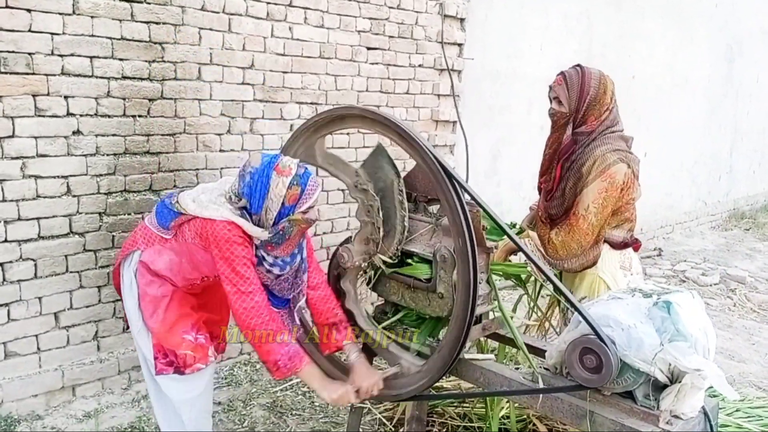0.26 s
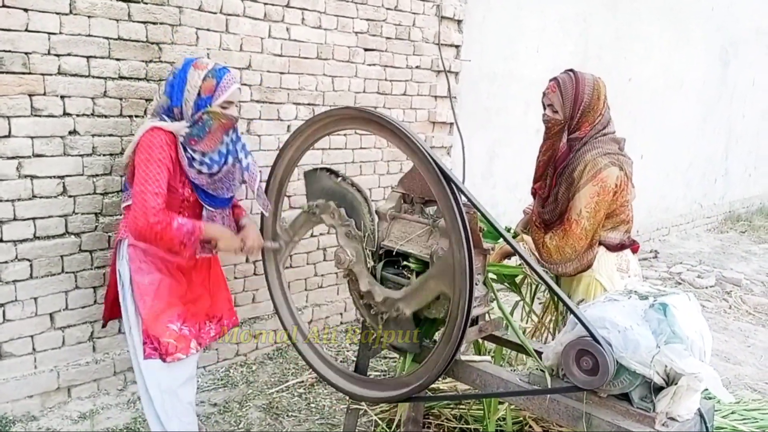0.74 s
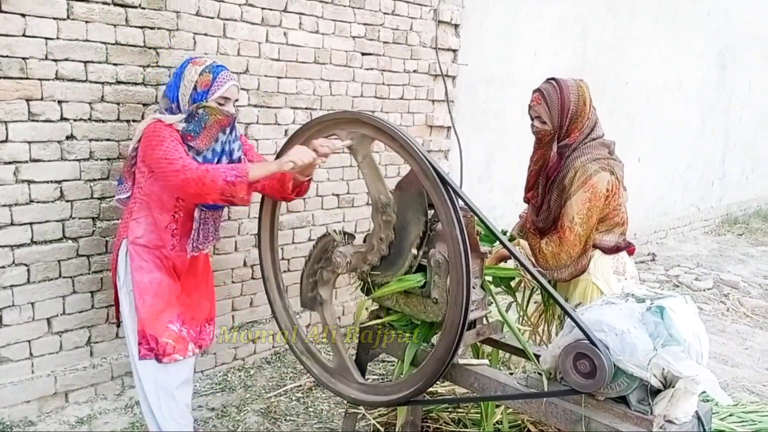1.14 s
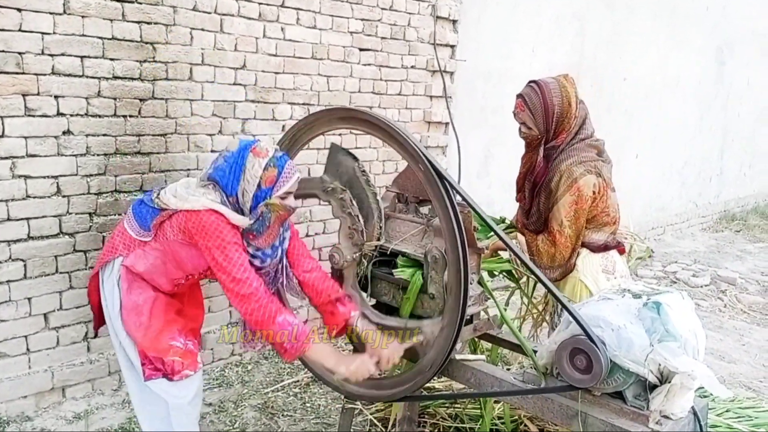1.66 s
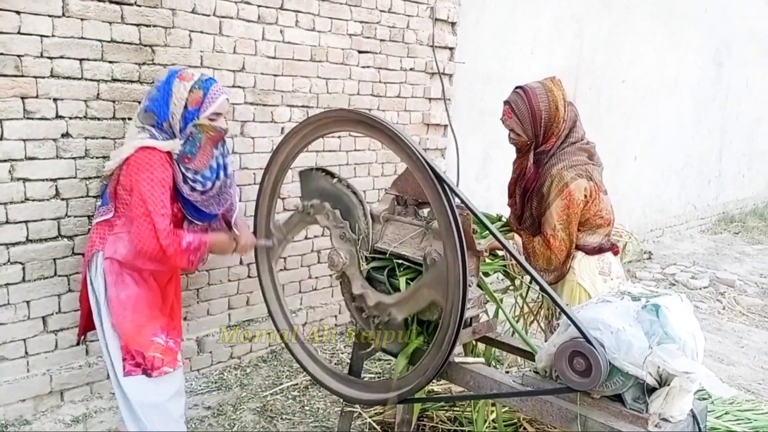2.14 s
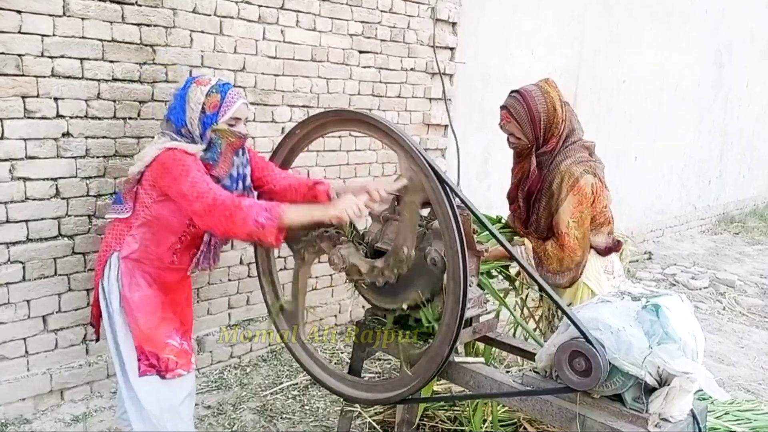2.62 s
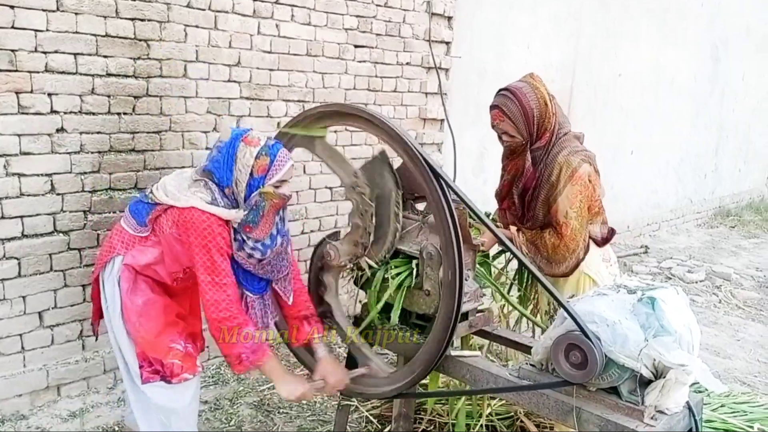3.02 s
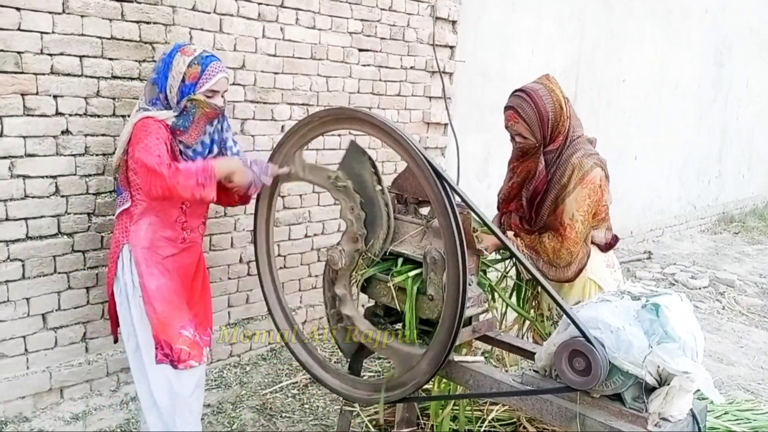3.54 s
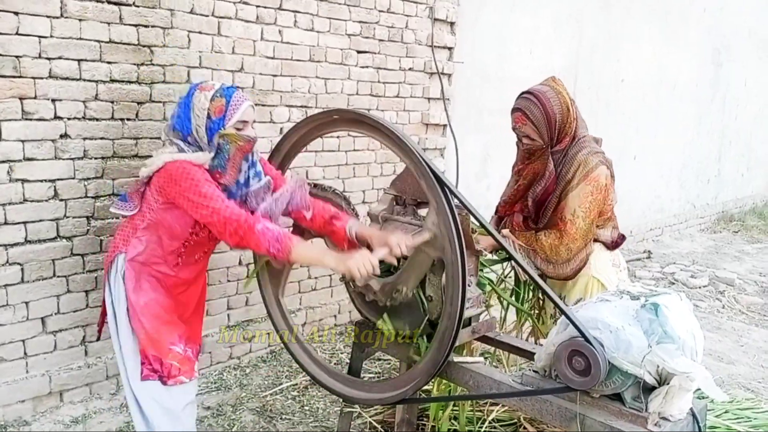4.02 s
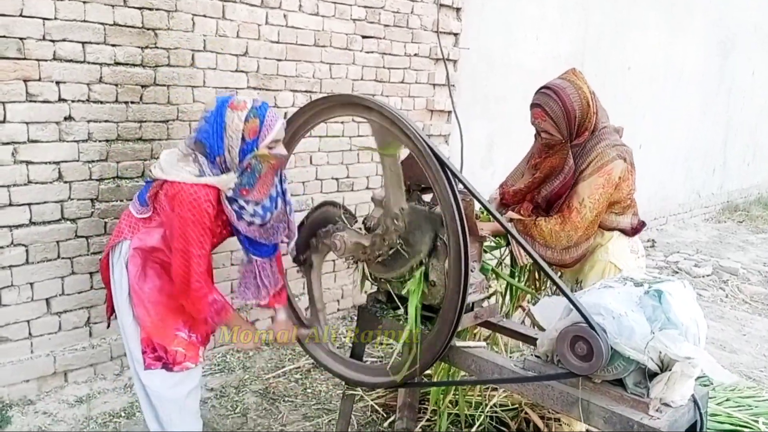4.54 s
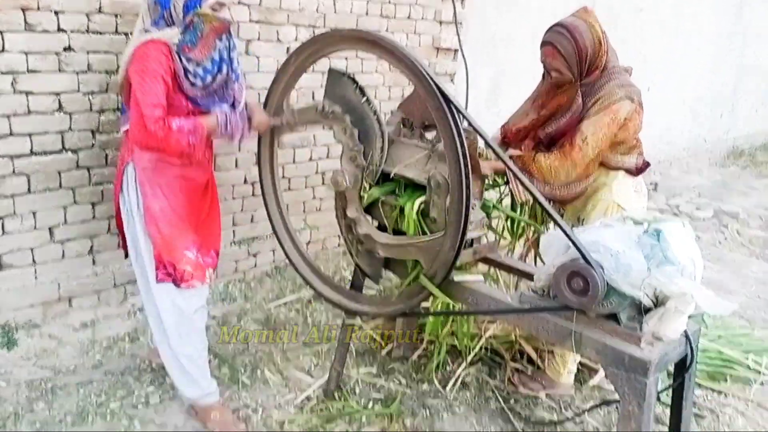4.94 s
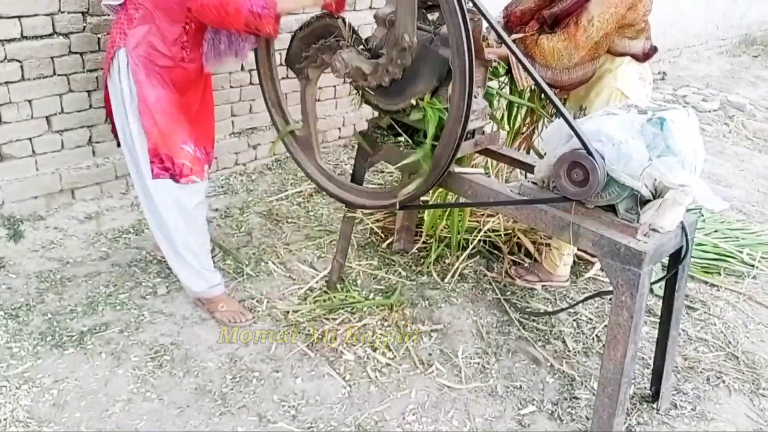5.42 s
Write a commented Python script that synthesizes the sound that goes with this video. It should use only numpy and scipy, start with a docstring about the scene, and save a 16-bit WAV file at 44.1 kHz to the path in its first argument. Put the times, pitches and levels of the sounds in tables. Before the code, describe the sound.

Outdoors, regular metallic clacks and crisp shearing crunches of fresh fodder repeat, with rustling stalks and hoarse squeaks over faint hiss.

```python
"""A yard before a brick wall, outdoors: a hand-turned chaff cutter works while light wind bumps the microphone.
Each blade knocks against the mouth plate, a rattling contact that rings the modes of the cast iron.
It then shears through green stalks: random snaps and rubbing noise swell to a crunch and shake the iron.
Gears tick and loose stalks rustle between strokes; near the start something squeaks, a rough gliding tone.
Streaky hiss and the wheel's narrow whirr lie underneath; the wall answers the knocks and squeaks."""
import sys
import numpy as np
from scipy import signal
from scipy.fft import rfft, irfft, next_fast_len
from scipy.io import wavfile
from scipy.ndimage import uniform_filter1d, map_coordinates

SR = 44100
rng = np.random.default_rng(int(sys.argv[2]) if len(sys.argv) > 2 else 0)


def to_wav(s):
    """Save 16-bit WAV."""
    ch = np.atleast_2d(s).T  # columns
    pcm = np.round(np.clip(ch, -1, 1) * 32767)  # PCM
    wavfile.write(sys.argv[1], SR, pcm.astype(np.int16))


N = 250466

# wind on the microphone, before the low cut: t/s, level/dB
BUFFET = [(0.0, -48), (0.03, -43.5), (0.33, -80.5), (0.5, -74), (0.82, -60), (0.98, -72), (1.23, -71),
          (1.47, -64), (1.66, -68), (2.04, -70), (2.17, -77), (2.4, -76.5), (2.55, -66), (3.35, -57),
          (3.59, -69), (4.73, -63), (5.19, -77.5), (5.68, -81)]
# spectrum of the wind, before the low cut: f/Hz, density/dB per Hz
RUMBLE = [(15, -61), (25, -4), (91, 5.5), (125, -0.5), (199, -7.5), (240, -18), (310, -70), (530, -120)]
# single bumps on the microphone: middle t/s, envelope peak level/dB, f/Hz
BUMPS = [(0.027, -34.5, 111), (0.089, -44, 89), (0.634, -46.5, 102), (0.942, -49.5, 80.5),
         (1.277, -50.5, 75.6), (2.902, -48, 99), (2.949, -36, 110), (3.176, -41, 102), (3.219, -42.5, 110),
         (4.457, -40.5, 106), (4.575, -43.5, 100)]
BUMP_CYCLES = 0.64  # from a bump's middle to 1/e of its envelope
# spectrum of the steady outdoor hiss, before its streaks: f/Hz, density/dB per Hz
YARD = [(120, -49), (200, -18), (875, -26), (994, -6.5), (1190, -91), (1330, 8), (1810, 0.5), (2260, 10.5),
        (4120, -12), (6490, -22), (7240, -52), (7930, -3.5), (9340, -30.5), (14700, -16), (15600, -10.5)]
# mean level of the hiss, before its flutter: t/s, level/dB
YARD_LEVEL = [(0, -61), (.8, -60), (1.7, -61.5), (2.8, -60), (3.6, -62), (4.3, -62.5), (5.1, -61.5),
              (5.68, -65)]
# thin bands in which the turning wheel whirrs: f/Hz, width/Hz, relative level/dB
WHIRR = [(991, 32, -4.5), (1349, 36, -3.5), (2305, 43, -0.5)]
WHIRR_DB = -10.5  # over the hiss, on average

# The strokes, rustles and idle wheel give drive levels, before each layer's own gain.
# strokes of a blade through the stalks: entry t/s, rise/s, entry level/dB, entry crackle over it/dB,
# time on to the thick of the bundle/s, level there/dB, swell/dB per s, release/dB per s,
# then at the thick, over the iron: crackle/dB, spray/dB, stand/dB
STROKES = [(.47, 0.044, -47.5, -2.5, 0.14, -49, 127, 304, 4, -4, -16),
           (1.148, 0.012, -42, -5.5, 0.19, -39.5, 111, 191, -6, -13, -8),
           (1.949, .04, -39, 4, 0.19, -46, 141, 130, 1, -6, -18.5),
           (2.496, 0.015, -38.5, -2, 0.15, -35.5, 140, 169, -7.5, -13, -13),
           (3.10, 0.069, -44, -10, 0.17, -37, 247, 173, -6, -5.5, -23),
           (3.738, 0.0057, -41.5, -10, 0.17, -34.5, 119, 244, -7, -14.5, -17),
           (4.56, 0.0092, -41.5, -1, 0.095, -42.5, 151, 173, -2, -8, -10.5),
           (5.248, 0.0037, -47, -0.5, .22, -33.5, 201, 168, -1.5, -12, -20.5)]
# rows iron, crackle, spray, stand: fade of the entry/dB per s, factor on swell and release
EFFORT_SLOPES = [(59.6, 1.15), (231, 1.14), (298, 0.91), (30, 2.05)]
ENTRY_SPRAY_DB, ENTRY_STAND_DB = -10.5, -32  # over the iron; spray also takes half the entry crackle
# loose stalks shifting in the trough between strokes: middle t/s,
# iron level/dB, crackle level/dB, spray level/dB, stand level/dB, half length/s
RUSTLES = [(0.022, -65, -57, -73, -68, 0.0067), (0.187, -65, -63, -66, -83, 0.047),
           (0.42, -61.5, -64, -64.5, -83, 0.065), (0.653, -69, -56, -66, -82, .03),
           (0.757, -62, -58.5, -76, -79, 0.039), (0.933, -79, -58.5, -61, -81, 0.018),
           (1.09, -58.5, -64.5, -85, -88, 0.036), (1.483, -74, -63, -63, -64.5, 0.07),
           (1.52, -50.5, -59, -64, -70, 0.022), (1.71, -73, -63, -60, -87, 0.027),
           (1.9, -66, -68, -59, -79.5, 0.12), (2.188, -73, -52, -54, -93, 0.092),
           (2.439, -52.5, -54.5, -56, -93, 0.034), (2.776, -64, -58, -61.5, -96, 0.15),
           (3.004, -62, -70, -60.5, -85, 0.22), (3.363, -49.5, -77, -72, -75, 0.03),
           (3.527, -69, -68, -63, -91, 0.11), (3.642, -65, -81, -59.5, -91, 0.027),
           (4.02, -56, -61, -57, -83, 0.022), (4.286, -65.5, -59.5, -63.5, -84, 0.043),
           (4.425, -68, -85, -62.5, -78, 0.052), (4.522, -58.5, -64, -53.5, -90, 0.016),
           (4.743, -51.5, -82, -84, -80, 0.061), (4.851, -57.5, -57.5, -55, -90, 0.03),
           (5.034, -67, -59.5, -61.5, -92, 0.038), (5.394, -66, -51.5, -55, -65, 0.058)]
RUSTLE_EDGE_DB = 5.5  # fall from the middle to the half length
# the turning wheel alone: levels/dB of iron, crackle, spray, stand
IDLE_DB = [-74.5, -109, -67.5, -89.5]
# spectrum of breaking stalks, before its streaks: f/Hz, density/dB per Hz
CRUNCH = [(240, -70), (400, -7.5), (491, -16), (595, -1.5), (798, 7), (918, 5.5), (1200, 13.5),
          (3900, -23.5), (5650, -20), (8500, -31), (11000, -112), (18700, -120)]
# finest fibre noise as the microphone colours it, before its streaks: f/Hz, density/dB per Hz
SPRAY = [(4410, -7), (7500, 5), (8000, -23), (9260, -7.5), (11300, -7.5), (14500, 11.5), (14900, 17.5),
         (15600, -20)]
# free modes of cast wheel, blades and trough: f/Hz, relative level/dB, t60/s
IRON = [(467, -13.5, 0.21), (538.5, -13, 0.3), (632, -2, 0.14), (725.7, -3, 0.11), (808.7, -0.5, 0.088),
        (1000, -9, 0.56), (1105, -4, 0.26), (1250, -7.5, 0.2), (1323.3, -1.5, 0.14), (1462, 4, 0.059),
        (1531, 6, 0.066), (1651, 2.5, 0.073), (1860, 0.5, 0.1), (2116, 4, 0.12), (2311, 2, 0.075),
        (2780, 16.5, 0.018), (2844, 0, 0.026), (2892, -3, 0.073), (3000, 3, 0.063), (3429, 0.5, 0.14),
        (3670, -9.5, 0.08), (4050, -25, 0.09), (4600, 2, 0.024), (5600, -28, 0.07), (5670, -5.5, 0.16),
        (6430, 7, 0.027), (6710, 4, 0.026)]
# the stand's low modes, for one of two passes: f/Hz, width/Hz, relative level/dB
STAND_MODES = [(324.4, 124, 10.5), (229, 49, 5.5)]

# knocks of blade, gears and stalks, before the final band filter: t/s, peak level of the middle modes/dB,
# treble over it/dB, body over it/dB, loudest region f/Hz, share of the free ring time
KNOCKS = [(0.109, -27.5, -18.5, -22, 2670, 0.35), (0.3567, -45.5, -19, -8.5, 1380, 0.89),
          (0.545, -41.5, -15, -1.5, 1100, 0.62), (0.8835, -59.5, -6, 11, 468, 0.24),
          (1.1464, -29, -7.5, -14.5, 1260, 0.74), (1.3029, -33, -7, -8.5, 1560, 0.41),
          (1.3374, -45, 2, 4.5, 844, 1.45), (1.4278, -46, -12, -16, 1570, 1.3),
          (1.5275, -37.5, -23, -15, 2310, 0.42), (1.6891, -48.5, 1.5, -39, 2330, 1.2),
          (1.8517, -37.5, -19, -13, 1270, 0.49), (1.955, -46, 5, 2, 760, 1.1),
          (1.9847, -36, -10, -5, 3430, 1.1), (2.083, -34, -23, -4, 630, 0.48),
          (2.1084, -40, 2.5, -28, 2150, 0.42), (2.2815, -46, -4, -15, 2180, 0.64),
          (2.4071, -45, -18, -36, 990, 0.37), (2.4942, -25.5, -7, -15, 1230, 0.71),
          (2.6411, -35.5, 0.5, 0, 1660, 0.54), (3.0522, -47, -3.5, -28, 1410, 1),
          (3.0985, -41.5, -30, -17, 1450, 0.79), (3.1208, -37.5, -35, -8, 1035, 0.31),
          (3.1707, -39, -8, -10, 1430, 1.5), (3.2823, -22.5, -10, -31, 1610, 0.31),
          (3.3494, -43, -11, 3.5, 677, 0.34), (3.4742, -45.5, -7, -19.5, 1394, 0.45),
          (3.5569, -45, -5.5, -15, 1204, 0.16), (3.7372, -26.5, -6.5, -12.5, 1240, 1.07),
          (3.8734, -34, -14, -5, 1410, 0.3), (3.8969, -37, 2.5, -1, 805, 0.8),
          (4.0668, -46.5, -26, -30, 1360, 0.28), (4.1572, -53.5, 1.5, -16, 2120, 0.38),
          (4.3411, -49.5, -6, -16, 3270, 0.57), (4.4557, -37.5, -34, -13.5, 1300, 0.46),
          (4.5691, -39, -7, 0, 800, 1.6), (4.595, -43, -3, 1, 700, 0.66), (4.6477, -38, -5, -35, 2110, 1.1),
          (4.7183, -35, -32, -3, 1120, 0.61), (4.8122, -40.5, -20, -34, 1485, .7),
          (5.04, -49.5, -10, -25, 3320, 0.4), (5.1135, -50.5, -29, -12.5, 2270, 0.35),
          (5.193, -56, -20, -19, 2336, .6), (5.2491, -29.5, -3, -23, 3270, 0.23),
          (5.2553, -32.5, -30, -14.5, 1300, 1.1), (5.2842, -46, -10, 13, 750, 1.3),
          (5.3788, -52.5, 11, 5, 700, 0.72), (5.4229, -35, -2, -4.5, 1580, 1.1),
          (5.4647, -31, 3, -6.5, 1970, 0.26)]
CONTACT_S = .0045  # time scale of a knock's rattle, strongest at half of it
SNAP_DB, SNAP_S = -11, .012  # drive of the dry crack over the knock's treble; its t60
# faint gear ticks: strongest level, treble and body over the level, base of the loudest region, ring share
TICK_DB, TICK_TREBLE_DB, TICK_BODY_DB, TICK_HZ, TICK_RING = -53.5, 7.5, -12, 2080, 0.98
# squeaks, before tremble and flutter: start t/s, length/s, first f/Hz, last f/Hz, level/dB, roughness 0-1
SQUEAKS = [(0.18, 0.085, 2950, 2820, -58, 0.9), (.445, 0.0986, 2950, 3200, -45, 0.68),
           (.69, 0.18, 2735, 2810, -53, .97), (.973, .09, 3060, 3000, -48.5, 0.42),
           (1.23, 0.11, 2800, 2600, -52.5, 0.3), (0.16, 0.046, 4000, 3630, -58.5, .8),
           (.655, 0.08, 4500, 4180, -60.5, 1), (0.7, .07, 3800, 4000, -64, 0.87),
           (0.67, 0.12, 6540, 6400, -68, 1)]
SQUEAK_EDGE_DB = 1  # droop half a length away from the strongest point, at 60 % of the squeak
# answer of brick wall and yard: f/Hz, t60/s
WALL = [(300, 0.12), (2000, 0.36), (10000, 0.44)]
NOTCH_HZ, NOTCH_WIDTH_HZ, NOTCH_DB = 7280, 175, -11  # a dip of the microphone
TOP_HZ = 15720  # its band limit


def amp(db):
    """dB to gain."""
    return 10 ** (np.asarray(db) / 20)


def unit(x):
    """Scaled to rms 1."""
    return x / np.sqrt(np.mean(x ** 2) + 1e-20)


def along(points, hz):
    """(Hz, value) points read on a log frequency axis."""
    f, v = np.transpose(points)
    return np.interp(np.log(hz + 1), np.log(f + 1), v)


def curve(points):
    """(s, value) points as one value per sample."""
    s, v = np.transpose(points)
    return np.interp(np.arange(N) / SR, s, v)


def wobble(rate):
    """A smooth random curve, rate knots a second."""
    knots = rng.standard_normal(int(N * rate / SR) + 4)
    return map_coordinates(knots, [np.arange(N) * rate / SR])


def filtered(x, response):
    """x times a complex response of frequency."""
    m = next_fast_len(x.shape[-1] + SR // 2)
    return irfft(rfft(x, m) * response(np.fft.rfftfreq(m, 1 / SR)), m)[..., :x.shape[-1]]


def coloured(x, spectrum):
    """x filtered by a spectrum in dB, rms 1."""
    return unit(filtered(x, lambda hz: amp(along(spectrum, hz))))


def modes(rows):
    """The causal response of (Hz, width, dB) resonances, with alternating signs."""
    return lambda f: sum((-1) ** k * amp(db) * 1j * f * w / (c * c - f * f + 1j * f * w)
                         for k, (c, w, db) in enumerate(rows))


def snaps(rate, spread_db, bed):
    """Fibres snapping at random moments, a few much louder, over a bed of rubbing noise."""
    happens = rng.random(N) < rate / SR
    size = np.minimum(rng.exponential(size=N), 3.5)
    sign = rng.choice([-1, 1], N)
    rub = rng.standard_normal(N)
    return unit(unit(happens * amp(spread_db * size) * sign) + bed * rub)


def streaky(x, depth_db, hops):
    """Rubbing feeds narrow resonances that come and go: a random gain, fine in pitch and long in time."""
    z = signal.stft(x, nperseg=512, noverlap=384)[2]
    field = uniform_filter1d(rng.standard_normal(z.shape), 2, 0)
    field = uniform_filter1d(field, round(hops), 1)
    gain = amp(depth_db * np.clip(unit(field), -2.5, 1.4))
    return unit(signal.istft(z * gain, nperseg=512, noverlap=384)[1][:N])


def wind():
    """Low noise in lumpy gusts, and short low swings where single gusts bump the microphone."""
    t = np.arange(N) / SR
    buffet = unit(amp(7.3 * wobble(36)) * coloured(rng.standard_normal(N), RUMBLE))
    low_cut = lambda f: (1j * f / 55 / (1 + 1j * f / 55)) ** 2
    gusts = filtered(amp(curve(BUFFET)) * buffet, low_cut)
    bumps = np.zeros(N)
    for s, db, hz in BUMPS:
        envelope = np.exp(-((t - s) * hz / BUMP_CYCLES) ** 2)
        bumps += amp(db) * envelope * np.sin(2 * np.pi * hz * (t - s))
    return gusts + bumps


def whirr():
    """The turning wheel: snaps and rubbing noise ring thin bands, relative to the hiss."""
    bands = unit(filtered(snaps(900, 2.5, bed=1.2), modes(WHIRR)))
    return amp(WHIRR_DB + 3.8 * wobble(5.7)) * bands


def yard():
    """Streaky, rattling outdoor hiss with the wheel's whirr, fluttering together in level."""
    hiss = streaky(coloured(snaps(600, 1.5, bed=1.0), YARD), depth_db=5.5, hops=17.3)
    return amp(curve(YARD_LEVEL) + 2.7 * wobble(24.05)) * (hiss + whirr())


def effort():
    """Drive of iron, crackle, spray and stand: a fading entry, a swell to the thick of the bundle, a release."""
    t = np.arange(N) / SR
    power = amp(IDLE_DB)[:, None] ** 2 * np.ones(N)
    for s, rise, entry_db, bright_db, delay, thick_db, swell, release, *over_db in STROKES:
        since, late = t - s, t - s - delay
        opening = np.clip(since / rise, 0, 1) ** 2
        slope_db = np.where(late < 0, swell * late, -release * late)
        first_db = [0, bright_db, ENTRY_SPRAY_DB + bright_db / 2, ENTRY_STAND_DB]
        for k, (lift_db, (fade, steep)) in enumerate(zip([0, *over_db], EFFORT_SLOPES)):
            fallen_db = fade * np.abs(since - rise) + steep * release * np.maximum(late, 0)
            entry = amp(entry_db + first_db[k] - fallen_db)
            thick = amp(thick_db + lift_db + steep * slope_db)
            power[k] += opening * (entry ** 2 + thick ** 2)
    for s, *level_db, half in RUSTLES:
        fall_db = RUSTLE_EDGE_DB * ((t - s) / half) ** 2
        power += amp(np.array(level_db)[:, None] - fall_db) ** 2
    return 10 * np.log10(power)


def pings(level_db, lo_hz, hi_hz, count, spread_db, damping):
    """Small blows, each ringing one mode of the iron briefly and slightly off pitch."""
    hz, db, t60 = np.transpose([m for m in IRON if lo_hz <= m[0] < hi_hz])
    draw, t = rng.random((count, 4)), np.arange(SR // 16) / SR
    start, mode = (draw[:, 0] * N).astype(int), (draw[:, 1] * len(hz)).astype(int)
    size = amp(db[mode] - spread_db * np.log(draw[:, 2] + 0.026))
    life = damping * t60[mode, None]
    pitch = hz[mode] * (1 + 0.029 * (draw[:, 3] - .5))
    onset = 1 - np.exp(-t / 0.014)
    wave = amp(-60 * t / life) * onset * np.sin(2 * np.pi * pitch[:, None] * t)
    rms = np.sqrt(np.sum((size[:, None] * wave) ** 2) / N)
    wave = wave * (size * amp(level_db[start]) / rms)[:, None]
    place = start[:, None] + np.arange(len(t))
    return np.bincount(place.ravel(), wave.ravel(), N + SR)[:N]


def shearing():
    """Snapping stalks crunch, spray fine noise and ring the iron, over low noise from its stand."""
    load_db, crackle_db, spray_db, stand_db = effort()
    clumps = 2 * wobble(60)  # dB: stalks give way in bunches

    force = amp(load_db + clumps) * snaps(900, 1.4, bed=1.0)
    iron = modes([(hz, 4.8 / t60, db) for hz, db, t60 in IRON if hz < 2700])
    gain = 1 / np.std(filtered(rng.standard_normal(N), iron))  # white noise would leave at rms 1
    ringing = amp(-11.5) * gain * filtered(force, iron)
    ringing += pings(load_db - 13.0, 500, 2700, count=1200, spread_db=6.0, damping=0.46)

    crunch = streaky(coloured(snaps(3000, 2.5, bed=1.2), CRUNCH), depth_db=7, hops=20)
    low = filtered(crunch, lambda hz: 1 / (1 + (hz / 3000) ** 8))
    dull = amp(load_db + clumps - 7) * unit(low)
    tearing = .8 * clumps + .8 * wobble(35)
    bright = amp(crackle_db + tearing - 4.5) * unit(crunch - low)

    fine = streaky(coloured(snaps(2500, 3, bed=0.83), SPRAY), depth_db=3.0, hops=12)
    puffs = .8 * clumps + 2.4 * wobble(38)
    spray = amp(spray_db + puffs - 0.06) * fine

    shaken = filtered(rng.standard_normal(N), lambda f: modes(STAND_MODES)(f) ** 2)
    stand = amp(stand_db) * unit(shaken)
    return ringing + dull + bright + spray + stand


def ticks(count):
    """Knock rows for the gear ticks, at random moments, strengths and pitches."""
    return [(a * N / SR, TICK_DB - 6 * b, TICK_TREBLE_DB, TICK_BODY_DB, TICK_HZ * (0.58 + 0.72 * c), TICK_RING)
            for a, b, c in rng.random((count, 3))]


def knocks():
    """Each knock is a short rattling contact that rings the iron's modes at new strengths, with a dry crack."""
    out, crack = np.zeros(N + SR), np.zeros(N + SR)
    t = np.arange(SR // 4) / SR
    hz, level, t60 = np.transpose(IRON)
    body, treble = hz < 900, hz > 3600
    for s, db, treble_db, body_db, centre_hz, ring in KNOCKS + ticks(count=14):
        # modes near the struck spot's pitch ring louder
        away = np.log(hz / centre_hz)
        place = 11 * np.exp(-(away / 0.084) ** 2) - 9 * np.abs(away)
        draw = rng.standard_normal((2, len(hz)))
        strength = level + place + 3 * draw[0]
        decay = amp(-60 * t / (max(ring, .1) * t60[:, None]))
        pitch = (hz * (1 + 0.0094 * draw[1]))[:, None]
        onset = 1 - np.exp(-t * hz[:, None] / 2.74)
        rings = amp(strength)[:, None] * decay * np.sin(2 * np.pi * pitch * t) * onset

        u = t[:SR // 20] / CONTACT_S
        contact = rng.standard_normal(len(u)) * u * np.exp(-2 * u)
        contact[SR // 2000] += 0.84 * np.linalg.norm(contact)  # a firm touch 0.5 ms into the rattle
        start = round(s * SR)
        for part, part_db in ((body, body_db), (~body & ~treble, 0), (treble, treble_db)):
            sound = signal.fftconvolve(rings[part].sum(axis=0), contact)[:len(t)]
            out[start:][:len(t)] += amp(db + part_db) * sound / np.max(np.abs(sound))
        crack_db = db + treble_db + SNAP_DB - 60 * t[:len(u)] / SNAP_S
        crack[start:][:len(u)] += amp(crack_db) * rng.standard_normal(len(u))

    low_cut = lambda f: (1j * f / 300 / (1 + 1j * f / 300)) ** 3
    high_cut = lambda f: 1 / (1 - (f / 9000) ** 2 + 1.2j * f / 9000) ** 2
    rung = filtered(out[:N], lambda f: low_cut(f) * high_cut(f))
    return rung + filtered(crack[:N], lambda f: amp(along(SPRAY, f)) * (f > 3000))


def squeaks():
    """Hoarse gliding notes: a trembling tone blurred by narrow noise, with a weak octave."""
    out, t = np.zeros(N), np.arange(N) / SR
    tremble, flutter = wobble(90), wobble(50.66)
    rasp = wobble(250) + 1j * wobble(250)
    for s, length, first_hz, last_hz, db, rough in SQUEAKS:
        u, rough = np.clip((t - s) / length, 0, 1), np.clip(rough, 0, 1)
        edge = np.clip(np.minimum(u, 1 - u) * length / 0.0013, 0, 1)  # 1.3 ms ramps
        edge = edge * amp(-SQUEAK_EDGE_DB * (2 * u - 1.2) ** 2)
        pitch = (first_hz + (last_hz - first_hz) * u) * (1 + 0.0139 * rough * tremble)
        carrier = np.exp(1j * 2 * np.pi * np.cumsum(pitch) / SR)
        blur = np.sqrt(rough / 2) * amp(0.89 * rough * flutter) * rasp
        tone = (np.sqrt(1 - rough) + blur) * carrier
        octave = amp(-13.5) * (1 - rough) * tone * carrier
        out += np.sqrt(2) * edge * amp(db + 0.45 * flutter) * (tone + octave).real
    return out


def wall(x):
    """The wall answers after 250 samples, about 2 m of extra path; each frequency dies at its own speed."""
    hz, t, z = signal.stft(rng.standard_normal(SR // 2), SR, nperseg=256)
    decay = amp(-60 * t / along(WALL, hz)[:, None])
    tail = signal.istft(z * decay, SR, nperseg=256)[1]
    return signal.fftconvolve(np.pad(x, (250, 0)), tail / np.linalg.norm(tail))[:N]


def scene():
    """The cutter before the wall, in the wind."""
    background = wind() + yard()
    stalks = shearing()
    near = knocks() + squeaks()
    return (background + stalks + near + amp(-12) * wall(near))[None]


def record(dry):
    """The microphone has a narrow dip and keeps nothing above its band limit."""
    def response(hz):
        dip_db = NOTCH_DB * np.exp(-((hz - NOTCH_HZ) / NOTCH_WIDTH_HZ) ** 2)
        return amp(dip_db) * (hz < TOP_HZ)
    return filtered(dry, response)


dry = scene()
out = record(dry)
to_wav(out)
```